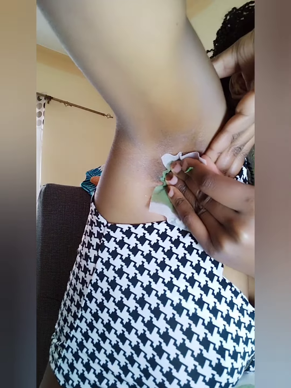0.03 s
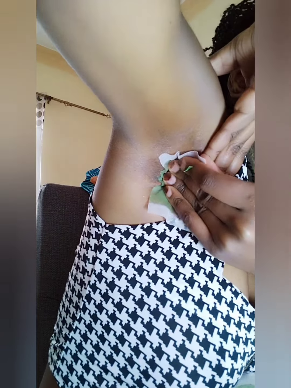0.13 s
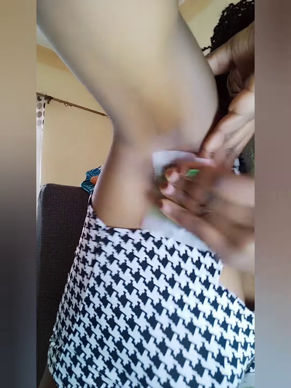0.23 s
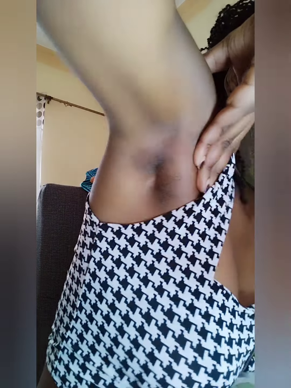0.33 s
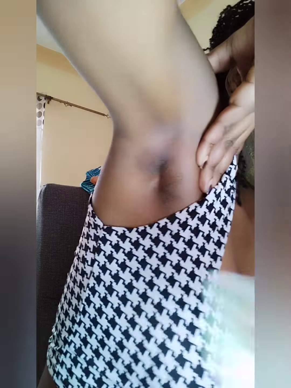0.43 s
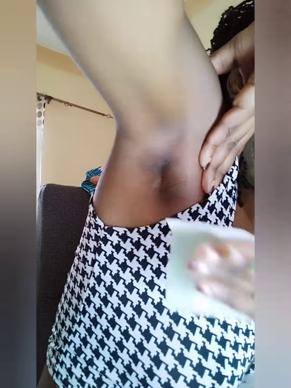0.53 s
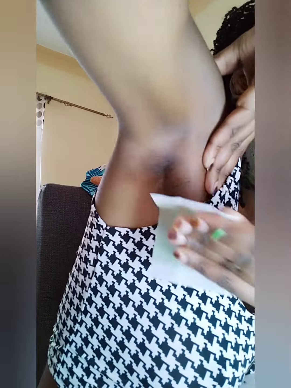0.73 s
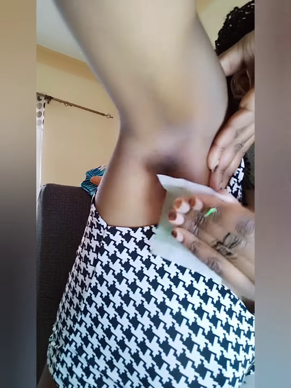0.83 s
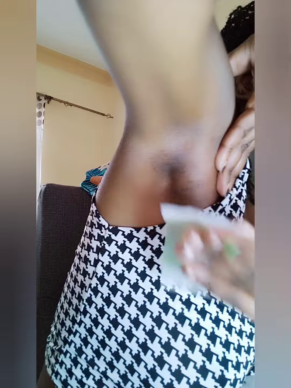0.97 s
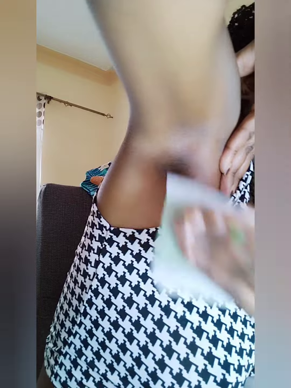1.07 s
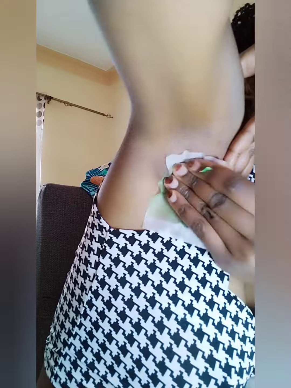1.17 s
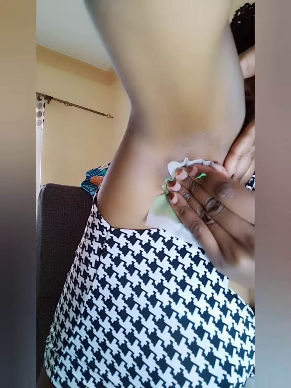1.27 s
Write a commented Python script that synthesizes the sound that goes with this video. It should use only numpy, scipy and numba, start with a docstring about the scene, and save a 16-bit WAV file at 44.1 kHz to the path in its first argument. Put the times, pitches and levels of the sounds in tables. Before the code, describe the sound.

One quick, loud rip of a wax strip off an armpit, then brief crinkling.

```python
"""In a small room, a wax strip is ripped off an armpit, close to a phone.
The wax lets go in a fast crowd of tiny snaps. They drum on the stretched skin and make the strip ring,
and its pitch falls as more of it comes free. The strip flaps and the arm's swing ends in a low thud.
Then the strip crinkles and rubs in the hand and is patted back on.
A low hum and a faint, far whine go on underneath."""
import sys
import numpy as np
from scipy import signal
from scipy.fft import rfft, irfft
from scipy.io import wavfile
from scipy.ndimage import uniform_filter1d
from numba import njit

SR = 44100
rng = np.random.default_rng(int(sys.argv[2]) if len(sys.argv) > 2 else 0)


def dump(signal):
    """Clip the signal to [-1, 1] and save it as 16-bit WAV at the path in sys.argv[1]."""
    limited = np.clip(np.atleast_2d(signal).T, -1, 1)
    pcm = np.round(limited * 32767).astype(np.int16)
    wavfile.write(sys.argv[1], SR, pcm)


N = 57330  # 1.3 s


def gain(db):
    """Turn decibels into a number to multiply by."""
    return 10 ** (np.asarray(db) / 20)


def unit(x):
    """Scale a sound so that its average strength (rms) is 1."""
    return x / np.sqrt(np.mean(x ** 2) + 1e-30)


def clock():
    """The time of every sample, in seconds."""
    return np.arange(N) / SR


def read_curve(hz, points):
    """Read between (frequency, value) points, giving every octave the same space."""
    freqs, values = np.array(points, float).T
    return np.interp(np.log(np.maximum(hz, 1)), np.log(freqs), values)


def colour(x, points):
    """Make each frequency louder or softer, following (frequency, level) points."""
    size = 8192
    response = gain(read_curve(np.arange(size // 2 + 1) * SR / size, points))
    cepstrum = irfft(np.log(response))
    # fold it in half, so the filter never answers before the sound arrives
    cepstrum[1:size // 2] *= 2
    cepstrum[size // 2 + 1:] = 0
    impulse = irfft(np.exp(rfft(cepstrum)))[:size // 2]
    return signal.fftconvolve(x, impulse)[:N]


def cut_bass(x, hz, order):
    """Turn down everything below hz; a higher order cuts more steeply."""
    return signal.sosfilt(signal.butter(order, hz, "high", fs=SR, output="sos"), x)


@njit
def band_pass(x, hz, width):
    """Let one band of frequencies through; its centre and width are given for every sample."""
    out, band, low = np.empty(len(x)), 0., 0.
    for i in range(len(x)):
        step, damping = np.tan(np.pi * hz[i] / SR), width[i] / hz[i]
        now = (band + step * (x[i] - low)) / (1 + step * (step + damping))
        band = 2 * now - band
        low = low + 2 * step * now
        out[i] = damping * now
    return out


def resonate(x, hz, width_hz):
    """Make a sound ring around one pitch, which may stay put or slide."""
    return band_pass(x, hz * np.ones(N), width_hz * np.ones(N))


def resonate_twice(x, hz, width_hz):
    """Ring, then ring again twice as wide, so less gets through far from the pitch."""
    return resonate(resonate(x, hz, width_hz), hz, 2 * width_hz)


def clicks(per_s, spread_db):
    """Clicks at random moments, of random sign and size."""
    hit = rng.random(N) < per_s / SR
    sign = np.sign(rng.standard_normal(N))
    return hit * sign * gain(spread_db * np.clip(rng.standard_normal(N), -2, 2))


def steady(x, span_s):
    """Even out the loudness over span_s, keeping the faster roughness."""
    power = uniform_filter1d(x ** 2, max(int(span_s * SR), 2))
    return x / np.sqrt(np.abs(power) + 1e-12)


def fade(start, fade_s):
    """Start suddenly, then die away. A fade time is how long a sound takes to drop 60 dB."""
    age = clock() - start
    return (age >= 0) * gain(-60 * np.maximum(age, 0) / fade_s)


def swell(peak_s, rise_s, fade_s):
    """Rise smoothly to a peak, then die away."""
    age = clock() - peak_s
    return (age < 0) * np.exp(-(age / rise_s) ** 2) + fade(peak_s, fade_s)


# the tone of the room's hum (frequency [Hz], level [dB])
HUM_COLOUR = [(20, -17), (50, -16), (95, -7), (130, -8.5), (162, 1), (210, -6), (290, -13), (400, -17),
              (1000, -20.5), (1400, -31.5), (2200, -37.5), (3800, -34.5), (6000, -38), (9000, -35.5),
              (16000, -30)]
def hum(level_db=-65.5):
    """The room hums: a steady noise that is mostly bass."""
    return gain(level_db) * unit(colour(rng.standard_normal(N), HUM_COLOUR))


# how loud the whine is (time [s], level of the main tone [dB], level of its overtones [dB])
WHINE_LEVELS = [(0, -78.5, -93.5), (.06, -75.5, -92.5), (0.149, -83, -90), (.7, -90, -101),
                (.82, -83.5, -86.5), (.98, -79, -101.5), (1.08, -75, -98), (1.3, -98, -98)]
# a small lift for each overtone (at twice the pitch [dB], at three times the pitch [dB])
OVERTONE_LIFTS = [0.5, 0.5]
def whine(pitch_hz=1109, wander_db=1):
    """A thin, far whine: one tone and two overtones, each wavering in loudness."""
    t, out = clock(), 0
    times, tone_db, overtones_db = np.array(WHINE_LEVELS).T
    levels = [tone_db] + [overtones_db + lift for lift in OVERTONE_LIFTS]
    for harmonic, db in enumerate(levels, start=1):
        wander = wander_db * np.interp(t, np.linspace(0, t[-1], 12), rng.standard_normal(12))
        tone = unit(np.sin(2 * np.pi * harmonic * pitch_hz * t))
        out = out + gain(np.interp(t, times, db) + wander) * tone
    return out


# the tone of the rubbing (frequency [Hz], level [dB])
RUB_COLOUR = [(30, -50.5), (200, -17), (1000, -14), (2000, -6.5), (3000, 1.5), (5700, 4.5), (8000, -3),
              (16000, -13.5)]
# each rub of the strip (time of the peak [s], level [dB], rise time [s], fade time [s])
RUB_STROKES = [(.03, -74.5, 0.034, .25), (0.351, -42, .014, 0.15), (0.43, -54, 0.024, .08),
               (.582, -61, .007, .05), (0.809, -73, 0.01, .05), (1.032, -63, 0.0055, 0.082),
               (1.097, -72, .014, 0.086), (1.1433, -42.5, 0.0045, 0.19), (1.162, -44, .006, 0.037),
               (1.238, -62, 0.012, 0.086)]
def rubs():
    """Grainy friction as the strip shifts in the hand and slides on skin."""
    friction = steady(colour(clicks(per_s=2800, spread_db=4), RUB_COLOUR), span_s=.0079)
    return friction * sum(gain(db) * swell(time, rise, fall) for time, db, rise, fall in RUB_STROKES)


SNAPS_PER_S, SNAP_SPREAD_DB = 7000, 7
PEEL_START_S, PEEL_END_S = .226, .254
STRIP_SHORT_HZ, STRIP_FREE_HZ = 5600, 2850
SKIN_LIFT_S, SKIN_LIFT_SPAN_S, SKIN_SLACK_DB = .222, .005, -9
# the tone of the bare snaps (frequency [Hz], level [dB])
CRACKLE_COLOUR = [(30, -63), (150, -42.5), (400, -25), (1500, -14), (2000, -16.5), (2600, 4), (4000, 0),
                  (5500, 1), (7000, -3), (16000, -4.5)]
# the tone of the stretched skin (frequency [Hz], level [dB])
SKIN_COLOUR = [(25, -69.5), (60, -48), (130, -15), (250, -9.5), (450, -4), (720, 1.5), (950, 5.5),
               (1300, -2.5), (1550, -10), (3000, -26), (16000, -68)]
# how loud the snaps are as the strip is pulled (time [s], level [dB])
PULL_LEVELS = [(.14, -76), (.168, -56.5), (.197, -47), (0.2057, -41.5), (0.2073, -30), (0.2195, -24.5),
               (0.2248, -14.5), (.231, -14.5), (.246, -15), (.2572, -14), (.2595, -27.5), (.27, -57)]
def rip(strip_db=-.5, crackle_db=1, skin_db=-8.5):
    """Wax threads snap in a crowd, ring the lengthening strip and drum on the stretched skin."""
    t = clock()
    times, levels = np.array(PULL_LEVELS).T
    pull = gain(np.interp(t, times, levels)) * (t > times[0]) * (t < times[-1])
    freed = np.clip((t - PEEL_START_S) / (PEEL_END_S - PEEL_START_S), 0, 1)
    strip_hz = STRIP_SHORT_HZ * (STRIP_FREE_HZ / STRIP_SHORT_HZ) ** freed
    snaps = clicks(SNAPS_PER_S, SNAP_SPREAD_DB)
    strip = steady(resonate_twice(snaps, strip_hz, width_hz=710), span_s=.002)
    crackle = steady(colour(clicks(SNAPS_PER_S, SNAP_SPREAD_DB), CRACKLE_COLOUR), span_s=.006)
    # the skin drums less until it is lifted tight
    slack = .5 - .5 * np.tanh((t - SKIN_LIFT_S) / SKIN_LIFT_SPAN_S)
    skin = steady(colour(snaps, SKIN_COLOUR), span_s=.01) * gain(SKIN_SLACK_DB * slack)
    return pull * (gain(strip_db) * strip + gain(crackle_db) * crackle + gain(skin_db) * skin)


# the tone of a crease's crack (frequency [Hz], level [dB])
CRACK_COLOUR = [(30, -54.5), (200, -28.5), (600, -16.5), (1500, -9), (2000, -14), (2700, 0), (5700, 4),
                (8000, -2), (11000, -3), (16000, 0)]
# each crease (time [s], level [dB], ring pitch [Hz], ring fade time [s], crack boost [dB])
CREASE_SNAPS = [(0.1662, -46, 4200, 0.013, -12), (.1997, -18.5, 6900, .006, -8),
                (.2134, -16.5, 5470, .0025, -4), (.2222, -8, 5200, .004, -4), (0.234, -8, 4210, .009, -6),
                (0.2565, -23, 2885, .005, -7), (0.3449, -28.5, 6940, 0.0092, -2),
                (.5707, -48, 6120, .006, -6), (0.5759, -53, 3600, .012, 4), (.578, -54.5, 6100, .035, -12),
                (1.0163, -48.5, 4100, .020, 9), (1.019, -52, 5700, .035, 3), (1.0365, -52, 4106, .008, 11),
                (1.054, -64, 4160, 0.021, -10), (1.093, -57.5, 5670, 0.025, -6),
                (1.1489, -22, 4830, 0.0079, 4), (1.1511, -17.5, 3136, 0.0063, 8.5),
                (1.1649, -17.5, 5545, 0.0091, -3), (1.171, -35, 5680, 0.0027, 1),
                (1.2353, -36, 5740, 0.0091, 2.5), (1.2392, -35.5, 5610, 0.0078, 3.5),
                (1.2472, -46.5, 5740, 0.021, -11.5), (1.2497, -63, 5520, .010, 15)]
def creases():
    """Creases in the strip snap over, each with a noisy crack and a short ring."""
    t, out = clock(), 0
    noise = steady(colour(rng.standard_normal(N), CRACK_COLOUR), span_s=.001) / 2
    for start, db, hz, fade_s, crack_db in CREASE_SNAPS:
        ring = np.sin(2 * np.pi * hz * (t - start)) * fade(start, fade_s)
        crack = gain(crack_db) * noise * fade(start, fade_s=.0045)
        out = out + gain(db) * (ring + crack)
    return cut_bass(out, hz=584, order=2)


# each soft blow of the strip (time [s], level [dB], fade time [s], rough pitch [Hz])
SOFT_BLOWS = [(0.255, -25.5, 0.015, 710), (0.3518, -36, 0.063, 675), (1.0172, -64, 0.014, 1330),
              (1.037, -58, 0.014, 646), (1.1412, -54, 0.16, 750), (1.151, -36, 0.025, 1575),
              (1.1649, -56, 0.013, 710)]
def flaps_and_pats():
    """The whole strip flaps tight or lands on skin, with a dull blow that dies quickly."""
    noise, out = cut_bass(rng.standard_normal(N), hz=286, order=3), 0
    for start, db, fade_s, hz in SOFT_BLOWS:
        blow = steady(resonate_twice(noise, hz, width_hz=600), span_s=.005)
        out = out + gain(db) * fade(start, fade_s) * blow
    return out


def swing_thud(stop_s=.343, pitch_hz=97, level_db=-54, air_db=-5):
    """A low, ringing thud with a puff of air as the arm's swing stops."""
    thud = np.sin(2 * np.pi * pitch_hz * (clock() - stop_s))
    air = unit(resonate(rng.standard_normal(N), pitch_hz, width_hz=120))
    return gain(level_db) * (thud + gain(air_db) * air) * swell(stop_s, rise_s=.014, fade_s=.2)


# the first echoes (delay [s], level [dB])
FIRST_ECHOES = [(.0062, -21.5), (.0175, -26.5)]
def echoes(x):
    """The sound bounces once off each of the nearest surfaces."""
    return sum(gain(db) * np.pad(x, (int(delay * SR), 0))[:N] for delay, db in FIRST_ECHOES)


# how long the room rings (frequency [Hz], fade time [s])
ROOM_FADES = [(150, .45), (900, 0.31), (3000, .35), (6000, .32), (12000, 0.16)]
# the tone of the room's ring (frequency [Hz], level [dB])
ROOM_RING_COLOUR = [(100, 4.5), (240, 10), (400, 1), (900, 0.5), (1800, 3.5), (3300, -5), (5500, -4),
                    (8000, 0), (16000, -5.5)]
def room(x, level_db=-14.5, delay_s=.0013, build_s=.012):
    """Many echoes blur together, build up and die away, the highest sounds first."""
    spectrum, tail = rfft(rng.standard_normal(N)), 0
    hz = np.arange(len(spectrum)) * SR / N
    octave = np.log2(np.clip(hz, 125, 16000) / 125)
    for k in range(8):  # each octave fades at its own speed
        band = irfft(spectrum * np.maximum(1 - np.abs(octave - k), 0), N)
        tail = tail + band * fade(delay_s, read_curve(125 * 2 ** k, ROOM_FADES))
    tail = tail * (1 - np.exp(-clock() / build_s))
    tail = colour(tail / np.sqrt(np.sum(tail ** 2)), ROOM_RING_COLOUR)
    return gain(level_db) * signal.fftconvolve(x, tail)[:N]


def scene():
    """The rip and the handling of the strip, in the room, over the hum and the whine."""
    tear = rip() + swing_thud()
    handling = creases() + rubs() + flaps_and_pats()
    near = tear + handling
    room_ring = room(tear + gain(-6.5) * handling)  # handling stirs the room less
    return (near + echoes(near) + room_ring + hum() + whine())[None]


# how strongly the microphone hears each frequency (frequency [Hz], level [dB])
MIC_COLOUR = [(100, -4), (3000, 0), (4150, 2.5), (4500, -8), (4900, -7.5), (5350, 1), (6200, -1),
              (7100, -4), (8200, -13.5), (9300, -26), (12000, -27.5), (14000, -35), (15700, -30.5)]
def record(dry):
    """The phone colours the sound, rounds the biggest peaks and cuts the deep bass and the very top."""
    peak_limit, top_hz = .97, 15800
    x = colour(dry[0], MIC_COLOUR)
    x = x / (1 + (x / peak_limit) ** 8) ** .125
    x = cut_bass(x, hz=50, order=2)
    top_cut = signal.ellip(8, .2, 70, top_hz, fs=SR, output="sos")
    return signal.sosfilt(top_cut, x)[None]


dry = scene()
out = record(dry)
dump(out)
```